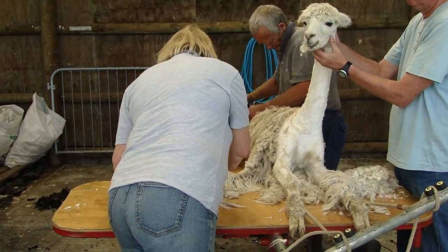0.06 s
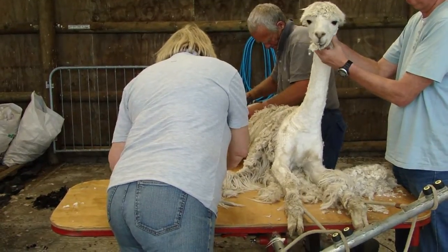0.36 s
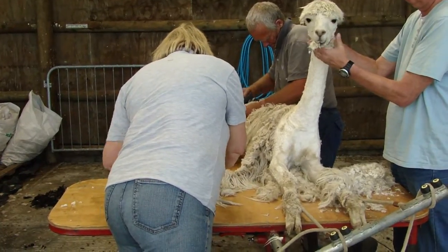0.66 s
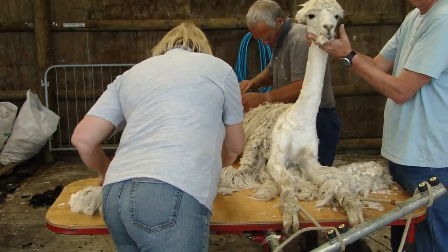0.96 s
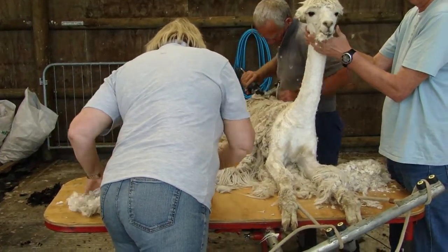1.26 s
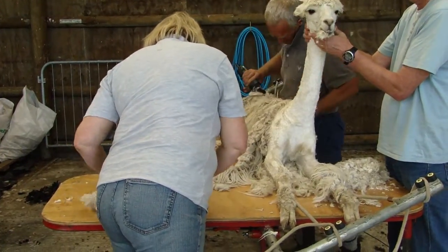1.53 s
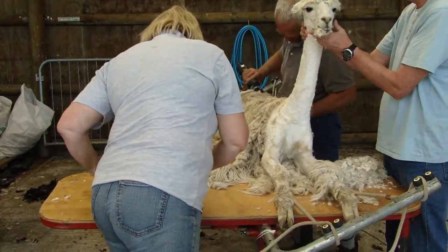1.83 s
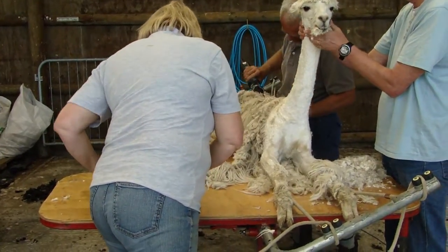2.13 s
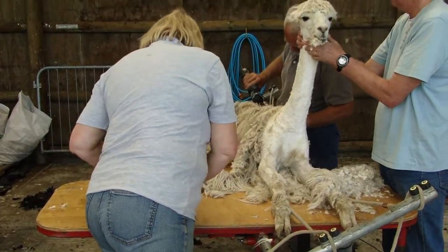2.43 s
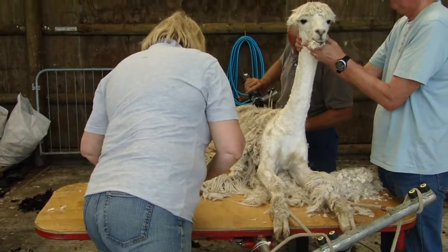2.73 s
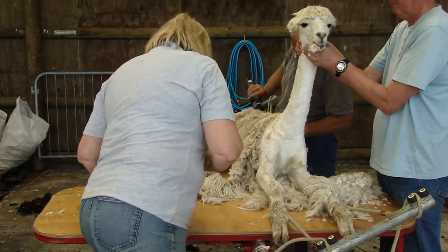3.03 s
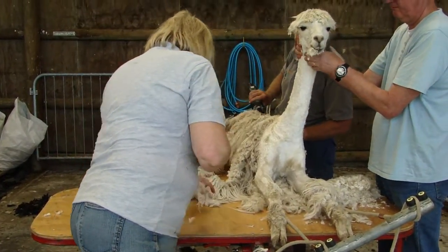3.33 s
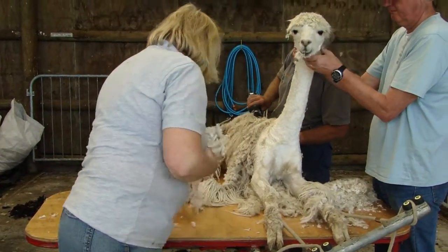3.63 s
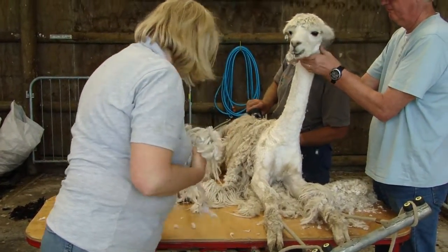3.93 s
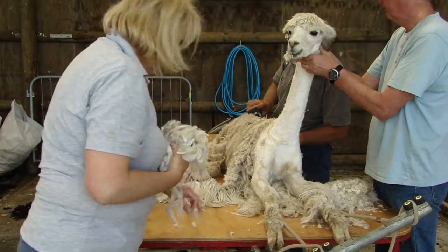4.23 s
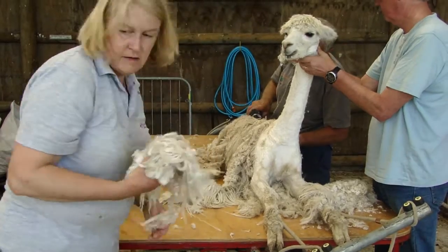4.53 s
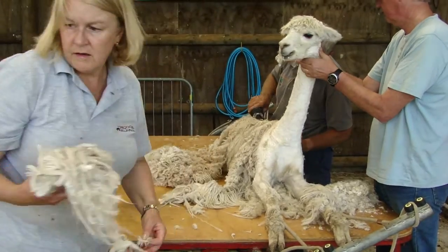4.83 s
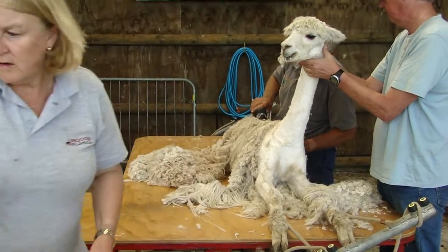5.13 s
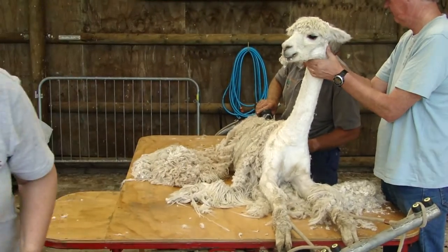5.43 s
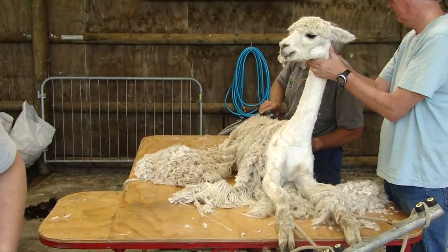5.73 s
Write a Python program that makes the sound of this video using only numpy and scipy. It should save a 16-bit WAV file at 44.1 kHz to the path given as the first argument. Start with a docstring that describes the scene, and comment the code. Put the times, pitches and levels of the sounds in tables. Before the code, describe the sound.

Electric clippers buzz and whir steadily as they cut thick fleece, heard from a few metres away with a short barn echo. Steel blades chatter and hiss while the motor sags a little and picks up again. Soft, dull knocks on a wooden table sound in the first half. Toward the end, the high gear whine and the rush of the fan, slightly to the right, become a little louder.

```python
"""An electric shearing handpiece works through an alpaca's fleece in a barn, two or three metres away.
Its motor sags and recovers with the load. The cutter slaps across the comb four times a crank turn,
hissing, ringing and now and then snagging; gears whine and rattle in the housing, and the cooling fan
rushes. A few soft bumps come from the shearing table."""
import sys
import numpy as np
from scipy import signal
from scipy.fft import rfft, irfft
from scipy.io import wavfile

SR = 44100
rng = np.random.default_rng(int(sys.argv[2]) if len(sys.argv) > 2 else 0)


def put_to_file(sound):
    """Save the sound as 16-bit audio at rate SR, in the file named by the first command-line argument."""
    columns = np.atleast_2d(sound).T  # one column per channel
    safe = np.clip(columns, -1, 1)
    whole_steps = np.round(safe * 32767)
    wavfile.write(sys.argv[1], SR, whole_steps.astype(np.int16))


N = 259308
T = np.arange(N) / SR
FREQ = np.fft.rfftfreq(N, 1 / SR) + 1e-3
GEAR_RATIO = 10.5  # motor turns per crank turn
CLEAR_S, CLEAR_FADE_S = 4.82, 0.12  # a helper steps out of the way: fan and faint tones get louder

# Motor speed, sagging under load. Each row: time in seconds, speed in turns per second.
MOTOR_SPEED = [(0, 437), (.2, 434.8), (.7, 422.7), (1.0, 422.3), (1.3, 435), (1.6, 436.8), (2.0, 429.6),
               (2.45, 442), (2.8, 446.3), (3.6, 429.6), (4.2, 423.6), (5.0, 442.6), (5.4, 445.8),
               (5.88, 437.6)]
# Cutter slaps in one crank turn. Each row: position in turns, relative level in dB.
CUTTER_SLAPS = [(.04, -8), (0.289, -5.5), (0.532, -9), (0.813, -3)]
# How far the gear head faces the listener. Each row: time in seconds, facing in dB (scaled per source).
HEAD_FACING = [(0, -8.5), (.8, -2), (1.2, 2), (1.6, 4), (2.3, 0), (3.3, 4), (3.7, 7.5), (4.8, 10.5),
               (5.45, 11.5), (5.88, 13)]
# Blade hiss while cutting. Each row: time in seconds, relative level in dB.
CUTTING_LEVEL = [(0.0, -28), (1.42, -25), (1.46, -21.5), (1.6, -25.5), (1.64, -22), (2.18, -24.5),
                 (2.24, -22), (2.59, -25), (2.83, -24.5), (4.17, -25), (4.83, -26.5), (4.95, -23),
                 (4.96, -26), (5.88, -25.5)]
# Blade hiss spectrum. Each row: frequency in Hz, relative density in dB.
HISS_SPECTRUM = [(50, -64), (300, -27), (1400, -20.5), (2500, 4), (3600, -1.5), (4300, 5), (5700, -1.74),
                 (7500, -4), (10400, -4), (11800, -9.5), (12600, -31)]


def blade_hiss(crank, slap_limit_rms=3.7):
    """The cutter slides and slaps over the comb: a bright hiss that buzzes more the harder it cuts."""
    # Comb resonances. Each row: frequency in Hz, width in Hz, relative level in dB.
    comb_modes = [(3520, 190, 6), (4630, 290, 4.5), (5380, 360, 7.5), (6770, 73, -2.5), (8470, 150, -11)]
    cutting_db = curve(CUTTING_LEVEL)
    bite = undb(3 + 1.5 * (cutting_db - cutting_db.mean()))  # ratio of slapping to sliding
    slaps = knocks(crank, CUTTER_SLAPS, decay_turns=0.045, scatter_db=3.5, jitter_turns=0.0066,
                   rise_turns=0.027)
    force = (bite * slaps + noise()) / np.sqrt(1 + bite ** 2)
    force = unit(np.tanh(force / slap_limit_rms))  # fleece cushions the hardest slaps
    comb = unit(sum(undb(db) * ring(force, [(hz, width_hz, 0)]) for hz, width_hz, db in comb_modes))
    return undb(cutting_db + 4) * unit(colour(force, HISS_SPECTRUM) + undb(-8) * comb)


def steel_ring(crank, fade_s=0.059):
    """In each stroke through the fleece, the grip lets the slaps ring two steel resonances."""
    # Each row: start and end in seconds, low ring in Hz, its level in dB, high ring in Hz, its level in dB.
    strokes = [(-.2, 0.7, 2520, -29, 3780, -31.5), (-.2, 1.0, 2950, -30, 4400, -31),
               (1.387, 1.844, 2470, -30.5, 4620, -43), (2.15, 3.055, 2370, -31.5, 6850, -33),
               (2.736, 3.597, 2910, -28.5, 5400, -29), (3.435, 4.358, 1776, -31, 6360, -32),
               (4.86, 6.1, 3750, -29.5, 5550, -32), (5.495, 5.758, 1930, -32.5, 5600, -32.5)]
    steel = np.zeros(N)
    for start_s, end_s, low_hz, low_db, high_hz, high_db in strokes:
        pressed = ramp(start_s, fade_s) - ramp(end_s, fade_s)
        slaps = knocks(crank, CUTTER_SLAPS, decay_turns=0.051, scatter_db=2.5, jitter_turns=0.005)
        steel += undb(low_db) * pressed * ring(slaps, [(low_hz, 0.1 * low_hz, 0)])
        steel += undb(high_db) * pressed * ring(slaps, [(high_hz, 0.11 * high_hz, 0)])
    return steel


def snag_chatter(crank, width_hz=140):
    """Snagged in fleece, the cutter strikes both ends of its swing; the fork rings in a fast flutter."""
    # Each row: centre in seconds, half width in seconds, level in dB, ring in Hz.
    snags = [(.46, .03, -25.5, 2960), (.6, .05, -26, 2960), (3.06, .04, -28, 3040), (3.31, .06, -26, 3000),
             (3.92, .035, -26, 3000), (4.437, .025, -21.5, 2990), (4.51, .055, -21, 2890),
             (4.61, .04, -26, 2930)]
    strikes = np.diff(np.floor(2 * crank), prepend=0)
    return sum(undb(db) * swell(centre_s, half_width_s) * ring(strikes, [(hz, width_hz, 0)])
               for centre_s, half_width_s, db, hz in snags)


def gear_whine(crank, flutter_db=2.0, flutter_hz=22):
    """The mesh sings; cutter strokes load it and add sidebands. All flutter with the fleece's grip."""
    # Mesh tone and sidebands, surging as the hand moves. Each row: time in seconds, level in dB.
    mesh_level = [(0, -38), (.3, -29), (.55, -38), (2.1, -34), (2.33, -27), (2.44, -33), (2.6, -27),
                  (2.76, -34), (2.9, -27.5), (3.05, -38), (3.5, -32), (3.62, -24.5), (3.93, -29),
                  (4.02, -24), (4.2, -27.5), (4.35, -25.5), (4.43, -18.5), (4.49, -25.5), (4.55, -21),
                  (4.63, -32), (4.72, -19.5), (4.88, -29), (5.05, -26), (5.2, -31), (5.38, -24), (5.5, -31),
                  (5.6, -29), (5.78, -37)]
    lower_level = [(0, -41), (.22, -38), (.4, -43), (1.2, -32.5), (1.7, -52), (2.2, -49), (2.8, -51),
                   (3.2, -59), (4.55, -26), (4.75, -30), (4.92, -20.5), (5.14, -37), (5.3, -22.5),
                   (5.7, -33)]
    upper_level = [(0, -36), (1.2, -43), (1.6, -47), (2.4, -36), (3, -32), (4.24, -46), (4.37, -29),
                   (4.55, -28), (4.72, -27), (4.85, -33), (5.05, -27), (5.25, -40), (5.7, -31)]
    mesh = 5 * GEAR_RATIO * crank
    parts = ((mesh, mesh_level), (mesh - 2 * crank, lower_level), (mesh + 2 * crank, upper_level))
    return sum(tone(turns, curve(level) + flutter_db * walk(flutter_hz)) for turns, level in parts)


def gear_case(crank, teeth_points=256):
    """Backlash rattles the case whenever the cutter reverses; tooth flaws repeat every turn."""
    # Fork reversals in one crank turn. Each row: position in turns, relative level in dB.
    reversals = [(0.021, -1.5), (.48, -6)]
    # Case resonances. Each row: frequency in Hz, width in Hz, gain in dB.
    case_modes = [(1778, 480, -9), (2105, 350, -2.5), (2390, 350, -3.5)]
    flaws = rng.standard_normal(teeth_points)
    teeth = unit(np.interp(crank % 1, np.linspace(0, 1, teeth_points), flaws))
    backlash = knocks(crank, reversals, decay_turns=0.25, scatter_db=3.5, jitter_turns=0.044)
    sliding = undb(-3) * noise()
    case = unit(ring(backlash + sliding, case_modes) + undb(-6) * ring(teeth, case_modes))
    return undb(-24 + 0.14 * curve(HEAD_FACING)) * case


def fork(crank):
    """The fork that swings the cutter clatters at each slap; the head hides it when facing the listener."""
    # Fork resonances. Each row: frequency in Hz, width in Hz, gain in dB.
    fork_modes = [(2743, 420, -3), (2980, 270, 2), (3400, 420, -5)]
    slaps = knocks(crank, CUTTER_SLAPS, decay_turns=0.11, scatter_db=2.5, jitter_turns=0.012)
    sliding = undb(-1) * noise()
    return undb(-21.5 - 0.19 * curve(HEAD_FACING)) * ring(slaps + sliding, fork_modes)


def motor_hum(crank):
    """The motor hums at its shaft rate and the octave above."""
    # Hum and octave. Each row: time in seconds, level in dB.
    hum_level = [(0, -47), (.4, -48), (.62, -53), (.9, -48), (1.15, -54), (1.5, -53), (1.95, -53),
                 (2.35, -58), (2.55, -46), (2.9, -49), (3.15, -64), (3.7, -50), (4, -47), (4.35, -45),
                 (4.55, -57), (5.3, -56), (5.88, -52)]
    octave_level = [(0, -44), (1.05, -50), (1.35, -39), (1.68, -38), (1.93, -52), (2.18, -38.5),
                    (2.42, -48), (2.8, -42), (3.25, -49), (4.42, -46), (4.62, -46), (4.88, -34.5),
                    (5.15, -46), (5.45, -65), (5.75, -47)]
    shaft = GEAR_RATIO * crank
    return tone(shaft, curve(hum_level)) + tone(2 * shaft, curve(octave_level))


def drive_tones(crank, waver_db=2.5, waver_hz=2.49):
    """The drive sings at crank harmonics; two swell as the speed carries them through housing modes."""
    # Each row: crank harmonic, resonance in Hz, width in Hz, relative level at resonance in dB.
    resonant_tones = [(27, 1144, 14, -41), (84, 3392, 38, -29.5)]
    # Each row: crank harmonic, relative level in dB.
    faint_tones = [(6, -66), (7, -56), (8, -54.5), (13, -48.5), (14, -56.5), (25, -51), (29, -48),
                   (33, -44), (35, -47), (38, -47.5), (57, -37), (62, -52)]
    crank_hz = curve(MOTOR_SPEED) / GEAR_RATIO
    resonant = sum(tone(k * crank, db) / np.hypot(1, 2 * (k * crank_hz - hz) / width_hz)
                   for k, hz, width_hz, db in resonant_tones)
    faint = sum(tone(k * crank, db + waver_db * walk(waver_hz)) for k, db in faint_tones)
    faint_db = -2.5 + 4 * ramp(CLEAR_S, CLEAR_FADE_S)
    return undb(0.46 * curve(HEAD_FACING)) * resonant + undb(faint_db) * faint


def fan(flutter_db=1.17, flutter_hz=14):
    """Cooling air rushes through the housing and rings its hollows; the vents turn with the head."""
    # Air spectrum. Each row: frequency in Hz, relative density in dB.
    air_spectrum = [(25, -62), (60, -37), (110, -35), (150, -28.5), (200, -31.5), (280, -9), (480, -2),
                    (600, -3.5), (850, 0.5), (980, -1.5), (1400, 0), (1550, -27), (1800, 7.5), (12000, -27)]
    # Housing hollows. Each row: frequency in Hz, width in Hz, gain in dB.
    duct_modes = [(303, 63, -16.5), (605, 58, -1), (770, 150, -4.5), (1140, 94, -3.5), (1690, 38, 1)]
    air = colour(noise(), air_spectrum) + undb(-4) * ring(noise(), duct_modes)
    level_db = -29.6 + 0.1531 * curve(HEAD_FACING) + 1.15 * ramp(CLEAR_S, CLEAR_FADE_S)
    return undb(level_db + flutter_db * walk(flutter_hz)) * air


def table_bumps(rise_s=0.0045):
    """Padded knocks on the wooden table, each with the boom of the spot it meets."""
    # Each row: start in seconds, relative level in dB, decay in seconds, boom in Hz, width in Hz.
    bumps = [(1.036, -41.5, 0.017, 222, 79.6), (1.359, -32, 0.033, 327, 260),
             (1.394, -29.5, 0.025, 265, 109), (1.385, -49, 0.065, 122, 50), (1.975, -35, 0.049, 343, 260),
             (2.18, -55, 0.09, 125, 50), (3.44, -46, 0.024, 250, 200)]
    out, t = np.zeros(N), T[:SR // 2]
    for start_s, db, decay_s, hz, width_hz in bumps:
        push = np.minimum(t / rise_s, 1) * np.exp(-t / decay_s) * rng.standard_normal(len(t))
        mode = [(hz, width_hz, 0)]
        boom = resonate(resonate(push, mode), mode)
        start = int(start_s * SR)
        out[start:start + len(t)] += undb(db) * np.sqrt(decay_s) * unit(boom)
    return out


def scattered_hiss():
    """The comb's teeth scatter hiss round the barn; it returns smooth and unrelated on each side."""
    return undb(curve(CUTTING_LEVEL)) * np.array([colour(noise(), HISS_SPECTRUM) for _ in range(2)])


def barn(x, t60_s=0.62, early_s=0.0078, drift_hz=4.5, path_count=5):
    """Quick reflections from table and people, then the barn's tail; paths change as the hand moves."""
    t = T[:SR // 2]
    running = np.concatenate([x[len(t) - 1:0:-1], x])  # the barn starts full of sound
    shape = (path_count, len(t))
    sides = []
    for _ in range(2):
        early = unit(rng.standard_normal(shape) * np.exp(-t / early_s) * (t > .001))
        tail = unit(rng.standard_normal(shape) * undb(-60 * t / t60_s) * (t > .012))
        responses = unit(undb(-1) * early + tail) / np.sqrt(len(t))
        shares = np.array([walk(drift_hz) for _ in range(path_count)])
        paths = signal.fftconvolve(running[None], responses, "valid", axes=1)
        sides.append(np.sum(shares * paths, axis=0) / np.linalg.norm(shares, axis=0))
    return np.array(sides)


def knocks(crank, pattern, decay_turns, scatter_db, jitter_turns, rise_turns=0.022):
    """Bursts of contact noise near set crank angles; rms 1."""
    turns = np.arange(-2, int(crank[-1]) + 3)
    force = np.zeros(N)
    for angle, db in pattern:
        chance = rng.standard_normal((len(turns), 2))
        hits = np.sort(turns + angle + jitter_turns * chance[:, 0])
        size = undb(db + scatter_db * chance[:, 1])
        coming = np.searchsorted(hits, crank)
        force += size[coming - 1] * np.exp((hits[coming - 1] - crank) / decay_turns)
        force += size[coming] * np.exp((crank - hits[coming]) / rise_turns)
    return unit(force * noise())


def resonate(x, modes):
    """Drive a set of resonances; a small part radiates little below its lowest one."""
    ringing = sum((-1) ** k * undb(db) * signal.lfilter(*signal.iirpeak(hz, hz / width_hz, fs=SR), x)
                  for k, (hz, width_hz, db) in enumerate(modes))
    low_cut = signal.butter(4, modes[0][0] / 2, "highpass", fs=SR, output="sos")
    return signal.sosfilt(low_cut, ringing)


def ring(x, modes):
    """Driven resonances; rms 1."""
    return unit(resonate(x, modes))


def colour(x, spectrum):
    """Filter by (Hz, dB) points; rms 1."""
    hz, db = np.transpose(spectrum)
    gain = undb(np.interp(np.log(FREQ), np.log(hz), db))
    return unit(irfft(rfft(x) * gain, N))


def tone(turns, rms_db):
    """Sine with a random starting phase."""
    return np.sqrt(2) * undb(rms_db) * np.sin(2 * np.pi * (turns + rng.random()))


def noise():
    """White noise, rms 1."""
    return rng.standard_normal(N)


def walk(rate_hz):
    """Random levels joined by ramps; rms 1."""
    times = (np.arange(int(T[-1] * rate_hz) + 3) - rng.random()) / rate_hz
    return unit(np.interp(T, times, rng.standard_normal(len(times))))


def curve(rows):
    """(Seconds, value) rows joined by straight lines."""
    return np.interp(T, *np.transpose(rows))


def ramp(centre_s, fade_s):
    """Linear rise from 0 to 1."""
    return np.clip((T - centre_s) / fade_s + .5, 0, 1)


def swell(centre_s, half_width_s):
    """Smooth rise and fall, at half height half_width_s to either side."""
    return np.clip(1 - ((T - centre_s) / half_width_s) ** 2 * (1 - np.sqrt(.5)), 0, 1) ** 2


def pan(x, right_db):
    """Mono to stereo, louder on the right."""
    return x * undb(np.array([[-right_db], [right_db]]) / 2)


def delay_left(x, lag_s):
    """Mono to stereo, later on the left."""
    return np.array([np.interp(T - lag_s, T, x), x])


def undb(db):
    """Decibels to gain."""
    return np.exp(np.asarray(db) * np.log(10) / 20)


def unit(x):
    """Scale to rms 1."""
    return x / np.sqrt(np.mean(x ** 2))


def scene():
    """One crank times the handpiece's tones and slaps; the barn surrounds it."""
    crank = np.cumsum(curve(MOTOR_SPEED)) / SR / GEAR_RATIO  # angle in turns
    thuds = table_bumps()
    whine = motor_hum(crank) + drive_tones(crank) + undb(-1) * gear_whine(crank)
    clatter = gear_case(crank) + fork(crank)
    hiss = undb(-5) * blade_hiss(crank)
    steel = steel_ring(crank)
    chatter = snag_chatter(crank)
    centre = hiss + undb(-2.5) * steel + undb(-9) * clatter
    right = pan(undb(-2.5) * (fan() + thuds), right_db=5) + delay_left(whine + chatter, lag_s=.00008)
    echo = barn(hiss + undb(2.5) * steel + undb(-0.5) * clatter
                + undb(-10) * chatter + undb(-14) * whine + undb(-8) * thuds)
    fan_echo = undb(-4.5) * np.array([fan(), fan()])  # unrelated on each side
    return centre + right + echo + fan_echo + scattered_hiss()


def record(dry, top_hz=12500):
    """Steep low-pass on the top treble."""
    return signal.sosfilt(signal.ellip(10, .2, 80, top_hz, fs=SR, output="sos"), dry)


dry = scene()
out = record(dry)
put_to_file(out)
```